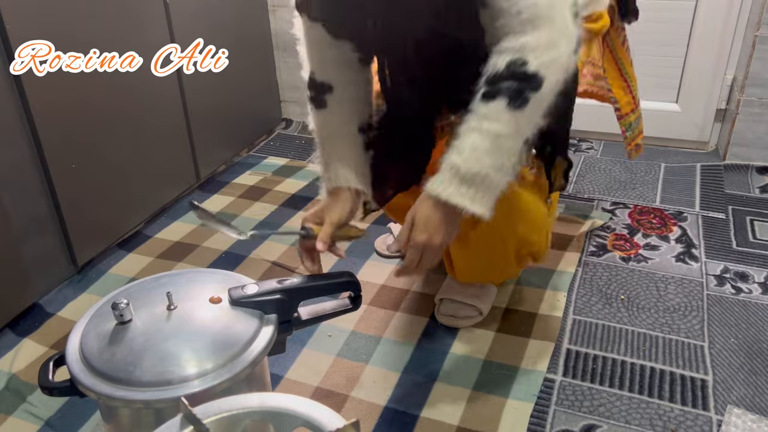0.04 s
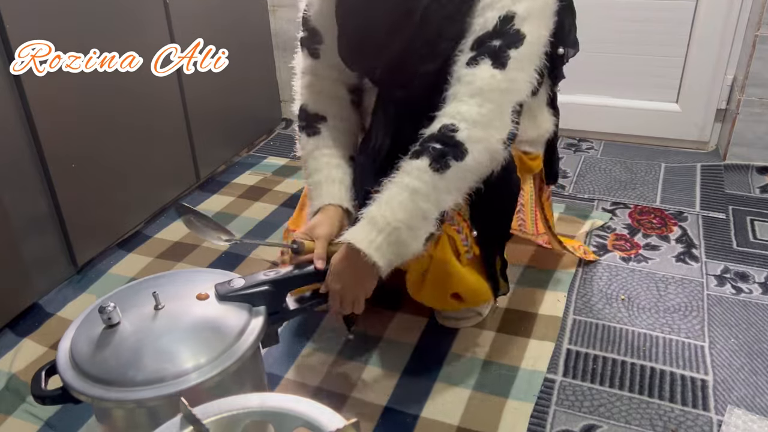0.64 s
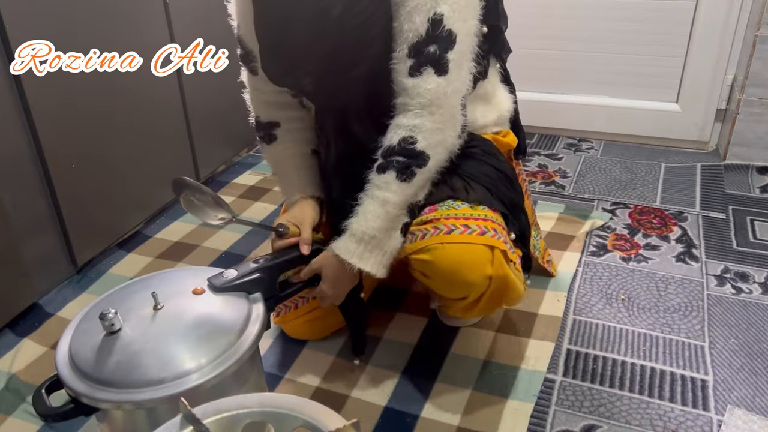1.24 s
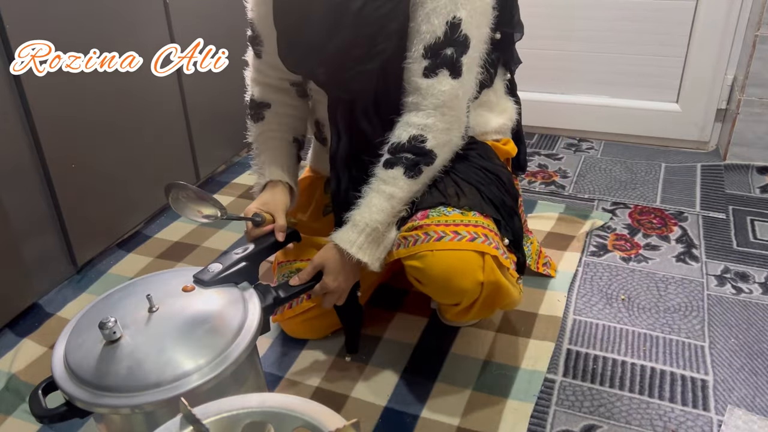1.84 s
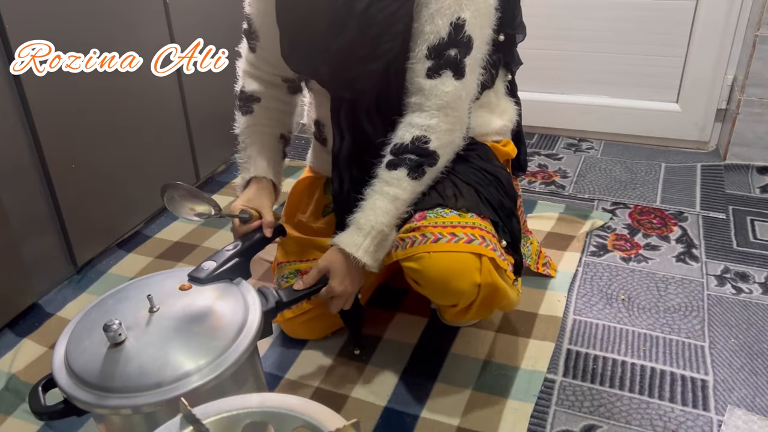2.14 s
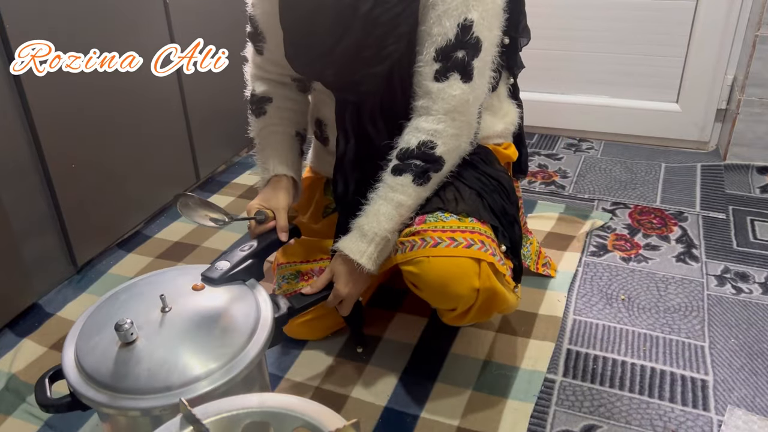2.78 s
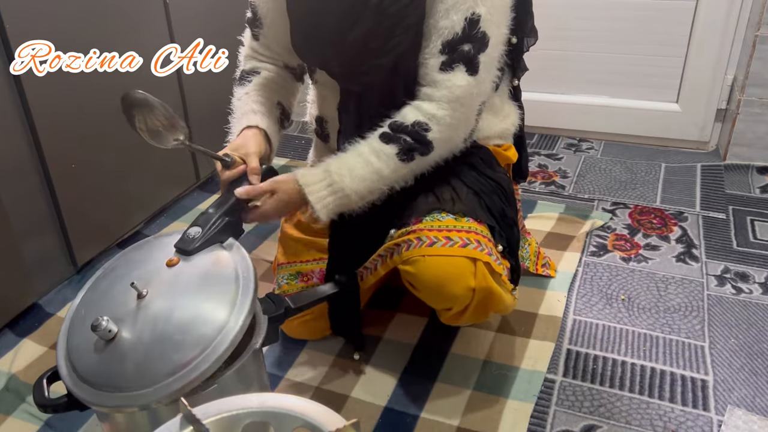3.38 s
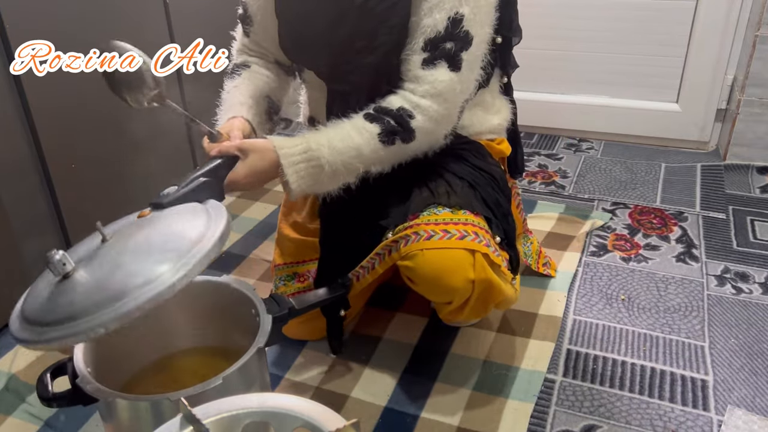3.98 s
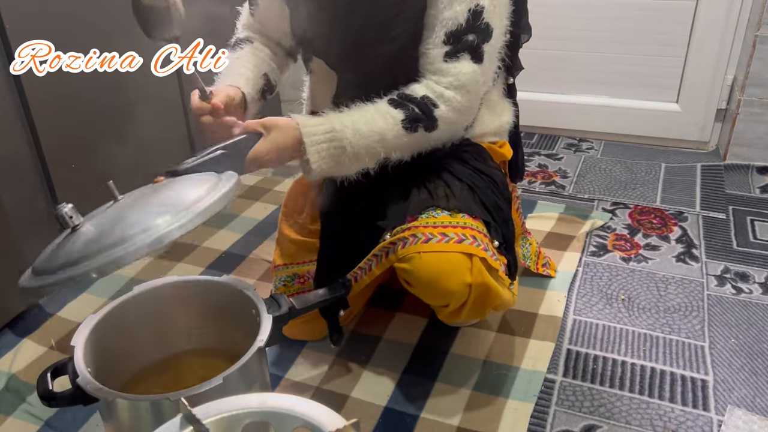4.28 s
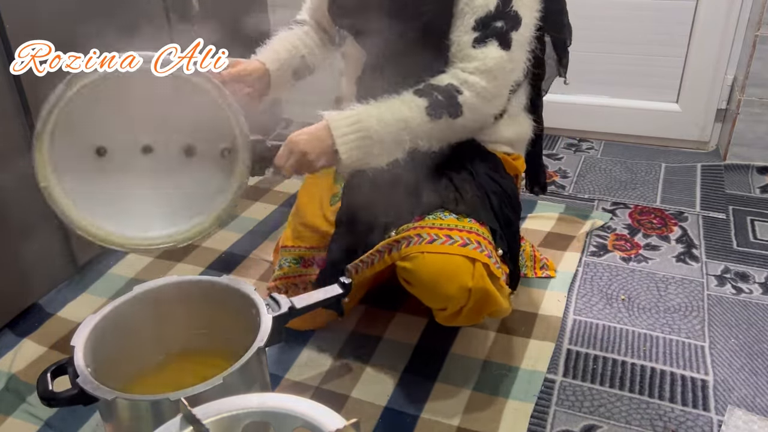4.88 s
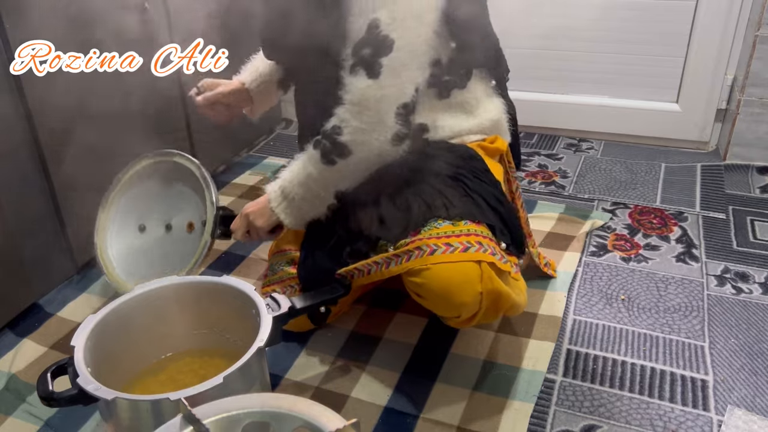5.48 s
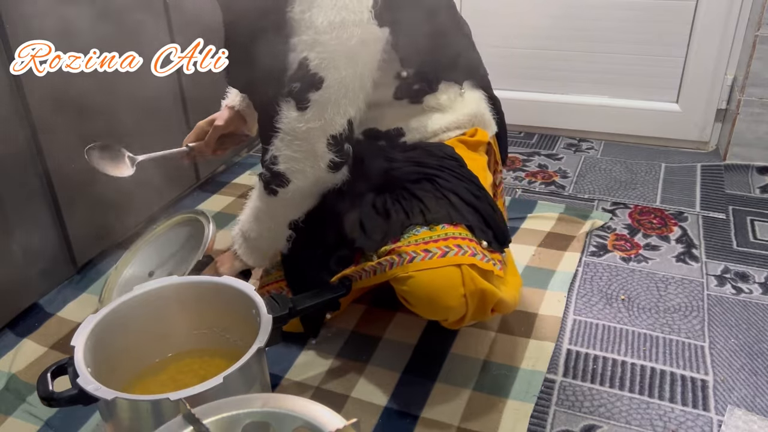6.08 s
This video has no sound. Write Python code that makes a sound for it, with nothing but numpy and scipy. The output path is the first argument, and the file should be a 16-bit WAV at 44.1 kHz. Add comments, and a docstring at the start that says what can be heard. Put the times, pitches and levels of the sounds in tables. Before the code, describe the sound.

A metal pressure cooker lid knocks and clunks as it is twisted open, then a ladle clinks and the lid is set down.

```python
"""A metal pressure cooker is opened on a kitchen floor, over a faint drone and hiss, in a small hard room.
0.3 s: a hand-held ladle knocks on the handles. 1.1-3.3 s: the lid twists and knocks in its lugs, damped
by the gasket. Through both, hands rub, sleeves swish and the full pot rocks and thuds against the floor.
4.1 s: the lid tilts up with thin stick-slip squeaks. 5.1 s: the ladle scrapes and strikes it, and rings.
6.0 s: the lid is set down, ringing. Each knock is a click, metal chatter, modes and a room tail."""
import sys
import numpy as np
from scipy import signal
from scipy.fft import rfft, irfft
from scipy.io import wavfile
from scipy.ndimage import uniform_filter1d

SR = 44100
rng = np.random.default_rng(int(sys.argv[2]) if len(sys.argv) > 2 else 0)


def waveform_to_disk(signal):
    """Save audio, clipped to [-1, 1], as 16-bit WAV at the path in sys.argv[1]."""
    frames = np.transpose(np.atleast_2d(signal))
    scaled = np.clip(frames, -1, 1) * 32767
    samples = np.round(scaled).astype(np.int16)
    wavfile.write(sys.argv[1], SR, samples)


N = 274468

# kitchen decay: f/Hz, t60/s
ROOM_T60 = [(120, 0.59), (450, 0.53), (1500, 0.63), (3800, 0.46), (7500, 0.33)]
# left-right correlation, clipped to +-1 in use: f/Hz, correlation
LIKENESS = [(70, 0.3), (220, 1.07), (500, 0.5), (1000, 0.1), (2000, 0.15), (4300, 0.28), (8000, 0.27)]
AIR_LIKENESS = [(60, 0.65), (290, 0.85), (640, -0.3), (1410, -0.65), (3100, -0.33), (15000, 0.054)]
# stereo balance: f/Hz, left minus right/dB
BALANCE = [(80, 0.5), (200, -1.5), (500, -0.72), (1500, -2.5), (4000, 2.2), (8000, -1.8)]
AIR_BALANCE = [(60, 1.5), (200, -1.5), (380, 0), (700, -2.5), (1290, 16.5), (2380, 9.5), (8120, 13.5),
               (15000, 3)]
# spectra of background, rubbing hands and sleeves: f/Hz, level/dB
AIR_COLOUR = [(22, -45.5), (40, -12.5), (150, -6), (175, -11.5), (202, 4), (237, -15), (325, -13),
              (700, -10), (1450, -12.5), (1900, -15.5), (2400, -22), (3100, -32), (6000, -31.5),
              (7000, -39.5), (9200, -40), (10500, -64)]
RUB_COLOUR = [(30, -10.5), (70, -4.5), (95, -1.5), (145, 3.5), (200, -3.5), (300, 0.5), (600, -7.5),
              (1000, -13.5), (2000, -30), (5000, -60)]
SWISH_COLOUR = [(400, -17.5), (1500, 8), (3000, 5.5), (6000, -1), (9000, -7.5), (10500, -29.5),
                (12000, -16.5), (14000, -31.5)]
# peaks in the hiss: f/Hz, width/Hz, lift/dB
HISS_BANDS = [(3540, 140, 14.1), (5900, 59, 11), (7730, 330, 18.9)]
# hand and sleeve movements: t/s, rise/s, time to release/s, rub/dB, swish/dB
MOVEMENTS = [ (0.093, 0.18, 0.29, -45.5, -63), (0.323, 0.04, 0.35, -51.5, -62.5),
             (0.706, 0.093, 0.32, -57, -63), (1.144, 0.052, 0.17, -53, -65), (1.46, 0.063, 0.25, -59, -64),
             (1.65, 0.03, 0.24, -54, -68), (1.978, 0.068, 0.11, -50.5, -59.5), (2.31, .03, 0.81, -54, -96),
             (2.476, 0.086, 0.056, -45, -54.5), (2.761, 0.025, 0.042, -41, -55.5),
             (3.144, 0.031, 0.3, -60.5, -97.5)]
# lid squeaks: t/s, length/s, first f/Hz, last f/Hz, level/dB
SQUEAKS = [(4.112, .125, 5600, 5880, -66), (4.12, .16, 2810, 3000, -73), (4.205, .1, 5400, 5000, -68),
           (4.19, .2, 4120, 3350, -76)]
# their hoarseness: t/s, rms waver/share of pitch
SQUEAK_WAVER = [(4.18, .007), (4.25, .021)]
# pot against floor: t/s, f/Hz, peak/dB
THUDS = [(.354, 155, -36), (.511, 111, -34), (1.310, 104, -33), (1.725, 98, -50.5), (1.828, 94, -45),
         (2.170, 88, -31), (2.199, 96, -31), (2.556, 108, -35), (2.592, 100, -35)]

# edges of the thump, body, clank, clink and tick bands: f/Hz
EDGES_HZ = [35, 250, 800, 2500, 5500, 10000]
# response to a hard blow, per band: level/dB
HANDLE_BANDS_DB = [-4, -4.5, 2, 2.5, -4.5]
COOKER_BANDS_DB = [-3, -2.5, -5, -4.5, -9]
LADLE_BANDS_DB = [-8, -1, 0, 3.5, 5]
LID_BANDS_DB = [-42, -16, 1.5, 3.5, -4]
# clear modes of handles, closed cooker, ladle on lid, free lid: f/Hz, level/dB
HANDLE_MODES = [(96, 8), (143, 15), (294, 6), (326, 6), (474, 4), (517, 6), (861, 4), (1055, 4), (1314, 4),
                (1486, 6), (1669, 4), (1739, 6), (1976, 7), (2118, 5), (2245, 4), (2756, 3), (3324, 8),
                (4107, 3), (4355, 5), (5760, 3)]
COOKER_MODES = [(95, 11), (144, 14), (196, 9), (238, 4), (295, 5), (351, 8), (378, 5), (474, 4), (548, 4),
                (565, 6), (685, 5), (727, 3), (834, 6), (968, 4), (1063, 3), (1217, 6), (1240, 6),
                (1362, 5), (1404, 5), (1880, 3), (1969, 7), (2030, 4), (2185, 4), (2258, 6), (2961, 1),
                (3120, 1), (3295, 6), (4362, 1), (4920, 2), (6193, 2), (8070, 2)]
LADLE_MODES = [(202, 10), (283, 9), (725, 7), (1808, 7), (1855, 11), (2092, 7), (2462, 11), (2488, 9),
               (3015, 9), (3092, 6), (3537, 9), (4457, 4), (4936, 10), (5573, 25), (5630, 18), (6406, 4),
               (7682, 10), (7973, 17), (8349, 11), (8918, 8), (9582, 6), (11950, 0), (15100, -3)]
LID_MODES = [(150, 6), (450, 6), (506, 10), (689, 7), (718, 9), (791, 12), (1815, 11), (1850, 14),
             (2148, 8), (2579, 8), (3076, 8), (3994, 8), (4448, 4), (6412, 4), (7660, 4)]
# mode decay before hand damping: f/Hz, t60/s
RING_T60 = [(140, .66), (500, 0.25), (1800, .6), (5600, 0.3), (8500, 0.4), (11000, 0.23)]
# spectra of the dense weaker modes: f/Hz, level/dB
HANDLE_COLOUR = [(29, -51), (50, -30), (136, -3), (193, -7.5), (282, -9), (439, -2.5), (612, -8),
                 (1190, -15.5), (1980, -8), (2590, -17.5), (3230, -12), (3800, -14.5), (4450, -13),
                 (5000, -22.5), (9150, -26), (10000, -48), (13000, -100), (22000, -120)]
COOKER_COLOUR = [(24, -46), (40, -16.5), (139, -7.5), (313, -6.5), (532, 1.5), (770, -7.5), (1370, -6),
                 (1650, -13.5), (1890, -6.5), (2440, -21), (3010, -17), (8510, -29), (10000, -38.5),
                 (13000, -80.5), (22000, -120)]
LADLE_COLOUR = [(59, -31.5), (100, -19), (283, -16.5), (1510, -15), (1800, 5.5), (2450, -9), (2700, -12),
                (2970, 0), (5190, -10), (5610, -20), (6060, -6.5), (10000, -1.5), (13000, -67.5),
                (22000, -120)]
LID_COLOUR = [(59, -64), (100, -14), (495, -7), (589, -9), (742, -16), (849, -9.5), (1480, -12),
              (1830, 3.5), (2360, -10.5), (3150, -8), (7940, -27.5), (10000, -35), (13000, -105),
              (22000, -120)]
# ladle on handles, lid turned in its lugs, ladle on lid, lid set down:
# t/s, strength/dB, bass heft/dB, contact/ms, chatter/s, room/dB, struck spot's f/Hz, its lift/dB
HANDLE_KNOCKS = [ (.309, -37.5, -18, 1.17, 0.0017, -15, 1370, 18),
                 (.3145, -31, -26, 2.3, 0.0075, -21, 515, 22), (.350, -31, -9, 0.96, 0.0077, -8, 610, 5.5),
                 (.360, -31, -4.5, 1.3, 0.0026, -23, 285, 10.5),
                 (.390, -44.5, -3, 0.44, 0.012, -15, 1860, 29),
                 (.498, -29, -7, 0.47, 0.022, -11.5, 667, 16),
                 (.508, -33.5, -1, 0.42, 0.011, -10.5, 880, 5),
                 (.525, -33.5, -4.5, 0.51, 0.0099, -8.5, 1930, -11)]
TWIST_KNOCKS = [ (1.146, -46, -12, 0.93, 0.025, -27, 3200, 22), (1.147, -38.5, -17, 3, 0.01, -14, 710, 28),
                (1.237, -58, 8, 0.03, 0.0094, -7, 288, 30), (1.299, -49, 0.5, 1.5, 0.012, -4, 314, 7),
                (1.565, -60.5, -2.5, 0.27, 0.008, -12, 2520, 3),
                (1.805, -46.5, -8.5, 2.1, 0.008, 10, 570, 3),
                (2.153, -30, -22.5, 3.6, 0.0027, -11, 634, 28), (2.168, -30, -5.5, 1.06, 0.04, -32, 280, 9),
                (2.190, -23, -17, 0.16, 0.0068, -5.5, 1255, 7.5),
                (2.1955, -24.5, -16.5, 0.05, 0.0018, -22, 547, -9),
                (2.1995, -24, -11.5, 0.18, 0.0072, -13, 2300, 13.5),
                (2.2025, -24, -15, 1, 0.0051, -19, 555, 5.5),
                (2.536, -33.5, -5, 0.45, 0.015, -9.5, 2300, 13.5),
                (2.5785, -28, -11.5, 0.46, 0.0069, -13.5, 1360, 11),
                (2.588, -34, -12, 0.45, 0.0021, -14, 473, 11),
                (2.799, -35, 0.5, 0.16, 0.0022, -4.5, 2810, 3), (2.808, -25.5, -7, 1, 0.011, -11, 530, 2),
                (2.842, -32.5, -17, 0.96, 0.025, -19, 690, 0), (2.866, -44, 12, 0.39, 0.041, -7.5, 220, 22),
                (3.034, -42, 0.5, 0.55, 0.011, -5, 480, 25.5), (3.286, -53, 4, 2, 0.021, -7.5, 261, 32.5)]
LADLE_KNOCKS = [(5.051, -53, -6, 0.25, 0.049, -17, 2830, 15), (5.09, -57, 1, 0.18, 0.092, -5, 3140, 2.8),
                (5.155, -39.5, -8, 0.052, 0.0072, -9, 2470, 4.9)]
LID_KNOCKS = [(5.965, -55.5, 11, 0.27, 0.0051, -8.5, 397, 6.2),
              (5.972, -41, -13.5, 0.18, 0.02, -7, 4400, 16),
              (5.978, -41.5, 7, 0.086, 0.029, -2.5, 1810, 22),
              (6.037, -43.5, 22.5, 0.14, 0.011, -8.5, 743, 14.6),
              (6.044, -49, 24.5, 0.27, 0.0097, -14, 3840, 4.1)]

EVENT_SAMPLES, ATTACK_SAMPLES = 2 ** 15, 1323  # a knock's first 30 ms set its level


def amp(db):
    """Decibels to gain."""
    return 10 ** (np.asarray(db) / 20)


def lookup(points, hz):
    """Table value on a log-frequency axis."""
    f, value = np.transpose(points)
    return np.interp(np.log(hz + 1), np.log(f + 1), value)


def unit_rms(x, count=None):
    """Scales x so its first count samples (or all) have rms 1."""
    return x / np.sqrt(np.mean(x[..., :count] ** 2) + 1e-20)


def hump(hz, centre_hz, width_hz, db):
    """Gain of a resonance db above its surroundings."""
    return np.sqrt(1 + (amp(db) ** 2 - 1) / (1 + (2 * (hz - centre_hz) / width_hz) ** 2))


def add(mix, start_s, sound):
    """Mixes a sound in at start_s."""
    part = mix[:, max(round(start_s * SR), 0):][:, :sound.shape[1]]
    part += sound[:, :part.shape[1]]


def sides(balance, hz):
    """Left and right gains per frequency."""
    return amp(np.array([[.5], [-.5]]) * lookup(balance, hz))


def noise(gain, hz, likeness=LIKENESS, balance=BALANCE):
    """Coloured stereo noise, partly correlated, rms 1."""
    left, other = np.exp(2j * np.pi * rng.random((2, len(hz))))
    same = np.clip(lookup(likeness, hz), -1, 1)
    right = same * left + np.sqrt(1 - same ** 2) * other
    return unit_rms(irfft(np.array([left, right]) * gain * sides(balance, hz)))


def wander(rate_hz):
    """Slow random curve, rms 1."""
    hz = np.fft.rfftfreq(N, 1 / SR)
    return unit_rms(irfft(rfft(rng.standard_normal(N)) / (1 + (hz / rate_hz) ** 4), N))


def air(level_db=-60.5, drop_db=3, drop_at_s=5.36, drop_takes_s=0.19):
    """Low drone and faint hiss with narrow peaks; the level drops slightly near the end."""
    hz = np.fft.rfftfreq(N, 1 / SR)
    colour = amp(lookup(AIR_COLOUR, hz)) * np.prod([hump(hz, *band) for band in HISS_BANDS], axis=0)
    dropped = np.clip((np.arange(N) / SR - drop_at_s) / drop_takes_s, 0, 1)
    return noise(colour, hz, AIR_LIKENESS, AIR_BALANCE) * amp(level_db - drop_db * dropped)


def movement(start_s, rise_s, length_s, release_db_per_s=77):
    """Envelope of one movement: builds up, dies away after length_s."""
    t = np.arange(N) / SR - start_s
    return np.clip(t / rise_s, 0, 1) * amp(-release_db_per_s * np.maximum(t - length_s, 0))


def handling(rub_lumps_db=2, swish_lumps_db=1.5, slips_per_s=45, slip_db=-9, slip_decay_s=0.0045):
    """Hands rub the cooker in uneven pushes with small sudden slips; sleeves swish along."""
    hz = np.fft.rfftfreq(N, 1 / SR)
    body = np.max([hump(hz, f, 35, 0.3 * db) for f, db in COOKER_MODES], axis=0)
    slips = (rng.random(N) < slips_per_s / SR) * rng.uniform(.5, 2, N)
    slips = unit_rms(signal.lfilter([1], [1, -np.exp(-1 / (slip_decay_s * SR))], slips))
    friction = noise(1, hz) * amp(rub_lumps_db * wander(rate_hz=18)) * (1 + amp(slip_db) * slips)
    rub = unit_rms(irfft(rfft(friction) * amp(lookup(RUB_COLOUR, hz)) * body, N))
    cloth = noise(amp(lookup(SWISH_COLOUR, hz)), hz)
    swish = unit_rms(cloth * amp(swish_lumps_db * wander(rate_hz=60)))
    power = sum((amp(levels_db)[:, None] * movement(start_s, rise_s, length_s)) ** 2
                for start_s, rise_s, length_s, *levels_db in MOVEMENTS)
    rub_gain, swish_gain = np.sqrt(power)
    return rub * rub_gain + swish * swish_gain


def squeaks(stutter_db=3):
    """The tilting lid sticks and slips: faint whistles that glide ever faster and turn hoarse."""
    out = np.zeros((2, N))
    for start_s, length_s, first_hz, last_hz, db in SQUEAKS:
        t = np.arange(0, length_s, 1 / SR)
        jitter = unit_rms(uniform_filter1d(rng.standard_normal((2, len(t))), size=100))
        waver = np.interp(start_s + t, *np.transpose(SQUEAK_WAVER)) * jitter
        pitch_hz = (first_hz + (last_hz - first_hz) * (t / length_s) ** 2) * (1 + waver)
        stutter = amp(stutter_db * unit_rms(uniform_filter1d(rng.standard_normal(len(t)), size=200)))
        whistle = unit_rms(stutter * np.sin(2 * np.pi * np.cumsum(pitch_hz, axis=1) / SR))
        add(out, start_s, amp(db) * np.sin(np.pi * t / length_s) * whistle)
    return out


def thuds(rise_s=0.014, boom_share=0.083, boom_t60_s=0.19):
    """The full pot rocks on its mat: each thud swells, dies fast and leaves a faint boom in the floor."""
    t, out = np.arange(EVENT_SAMPLES) / SR, np.zeros((2, N))
    push = (t / rise_s) ** 2 * np.exp(2 * (1 - t / rise_s))
    boom = boom_share * (1 - np.exp(-t / rise_s)) * np.exp(-np.log(1000) * t / boom_t60_s)
    for start_s, hz, db in THUDS:
        tone = np.sin(2 * np.pi * (hz * t + rng.random()))
        add(out, start_s, amp(db) * np.hypot(push, boom) * tone[None])
    return out


def crack(t, spread_s=0.01, bounce_s=0.0038, bounce_gain=0.63):
    """Contact click, its bounce off the cabinet and a few scattered slaps."""
    clicks = np.zeros((2, len(t)))
    clicks[:, int(.001 * SR)] = 1
    clicks[:, int(bounce_s * SR)] = bounce_gain
    for side in clicks:
        side[(rng.uniform(.002, spread_s, size=5) * SR).astype(int)] += rng.normal(0, 0.71, size=5)
    return clicks


def ringing(modes, t, spot_hz, spot_db, twin_share=.5, hand_damping_db_per_s=14, rise_s=0.0011):
    """Fluttering metal ring: each mode beats with a slightly detuned twin. Modes x channels x time."""
    hz, db = np.transpose(modes)
    left = rng.uniform(0, 2 * np.pi, len(hz))
    right = left + rng.choice([-1, 1], len(hz)) * np.arccos(np.clip(lookup(LIKENESS, hz), -1, 1))
    phase = np.array([left, right])[..., None]
    gain = amp(db) * hump(hz, spot_hz, .16 * spot_hz, spot_db) * sides(BALANCE, hz)
    loss_per_s = np.log(1000) / lookup(RING_T60, hz) + np.log(amp(hand_damping_db_per_s))
    fade = np.exp(-loss_per_s[:, None] * t) * (1 - np.exp(-t / rise_s))
    twin_hz = hz * (1 + rng.uniform(-.0075, .005, len(hz)))
    tone = np.sin(2 * np.pi * hz[:, None] * t + phase)
    twin = np.cos(2 * np.pi * twin_hz[:, None] * t + phase)
    return ((tone + twin_share * twin) * fade * gain[..., None]).swapaxes(0, 1)


def blows(rows, bands_db, steepness, heft_below_hz=250):
    """Band levels per knock: long, soft contact loses treble; weight behind it adds bass."""
    centres_hz = np.sqrt(np.multiply(EDGES_HZ[:-1], EDGES_HZ[1:]))
    for start_s, strength_db, heft_db, contact_ms, *rest in rows:
        cycles = centres_hz * contact_ms / 1000
        dulling_db = 10 * np.log10(1 + cycles ** steepness)
        bass_db = heft_db * (centres_hz < heft_below_hz)
        yield start_s, strength_db + np.array(bands_db) + bass_db - dulling_db, *rest


def knocks(hits, modes, colour, ring_db, crack_db, min_width_hz, sparkle_db, hard_blow_db=-34):
    """Struck metal, band by band: a crack, brief chatter, ringing modes and the room's tail."""
    t, hz = np.arange(EVENT_SAMPLES) / SR, np.fft.rfftfreq(EVENT_SAMPLES, 1 / SR)
    peaks = np.max([hump(hz, f, min_width_hz + 0.0084 * f, db) for f, db in modes], axis=0)
    body = amp(lookup(colour, hz)) * peaks
    mode_hz, out = np.array(modes)[:, 0], np.zeros((2, N))
    highpass = signal.butter(4, EDGES_HZ[-1], "high", fs=SR, output="sos")
    for start_s, levels_db, chatter_s, room_db, spot_hz, spot_db in hits:
        dense = noise(body * hump(hz, spot_hz, 0.091 * spot_hz, spot_db), hz)
        clicks, rings = crack(t), ringing(modes, t, spot_hz, spot_db)
        chatter = np.exp(-(t / chatter_s) ** 2)
        sound = np.zeros((2, len(t)))
        for low_hz, high_hz, db in zip(EDGES_HZ, EDGES_HZ[1:], levels_db):
            band = signal.butter(4, (low_hz, high_hz), "band", fs=SR, output="sos")
            centre_hz = np.sqrt(low_hz * high_hz)
            tail = amp(room_db) * np.exp(-np.log(1000) * t / lookup(ROOM_T60, centre_hz))
            swell = 1 - np.exp(-t / (.17 * chatter_s + .6 / centre_hz))  # scrapes and bass build slowly
            ring = rings[(mode_hz >= low_hz) & (mode_hz < high_hz)].sum(0)
            part = unit_rms(signal.sosfilt(band, dense) * np.hypot(chatter, tail) * swell, ATTACK_SAMPLES)
            part += amp(crack_db) * unit_rms(signal.sosfilt(band, clicks + 1e-12), ATTACK_SAMPLES)
            part += amp(ring_db + room_db) * unit_rms(ring, ATTACK_SAMPLES)
            sound += amp(db) * unit_rms(part, ATTACK_SAMPLES)
        # above the bands: sparkle during contact, then only the highest modes
        grit = 0.2 * rng.standard_normal(clicks.shape) * np.exp(-t / chatter_s)
        sparkle = unit_rms(signal.sosfilt(highpass, clicks + grit + 1e-12), ATTACK_SAMPLES)
        treble = amp(sparkle_db) * sparkle + amp(-19) * rings[mode_hz >= EDGES_HZ[-1]].sum(0)
        softness_db = 0.9 * min(levels_db[-1] - hard_blow_db, 0)  # gentle contact is duller
        add(out, start_s, sound + amp(levels_db[-1] + softness_db) * treble)
    return out


def scene():
    """Four sets of knocks over thuds, handling, background and squeaks."""
    handles = knocks(blows(HANDLE_KNOCKS, HANDLE_BANDS_DB, steepness=3.25), HANDLE_MODES, HANDLE_COLOUR,
                     ring_db=-0.5, crack_db=-28, min_width_hz=2.8, sparkle_db=-24)
    twist = knocks(blows(TWIST_KNOCKS, COOKER_BANDS_DB, steepness=2.7), COOKER_MODES, COOKER_COLOUR,
                   ring_db=0.5, crack_db=-12, min_width_hz=9, sparkle_db=-22)
    ladle = knocks(blows(LADLE_KNOCKS, LADLE_BANDS_DB, steepness=9.3), LADLE_MODES, LADLE_COLOUR,
                   ring_db=3.5, crack_db=-15, min_width_hz=6.5, sparkle_db=-10)
    lid = knocks(blows(LID_KNOCKS, LID_BANDS_DB, steepness=5.9, heft_below_hz=800), LID_MODES, LID_COLOUR,
                 ring_db=-4, crack_db=-45, min_width_hz=5, sparkle_db=-22)
    return handles + twist + ladle + lid + thuds() + handling() + air() + squeaks()


def record(dry, low_cut_hz=15, mono_below_hz=68, cutoff_hz=16000):
    """Two closely spaced microphones: low cut, bass alike in both, band limit."""
    hz = np.fft.rfftfreq(N, 1 / SR)
    spectrum = rfft(dry) * (1 - 1 / (1 + (hz / low_cut_hz) ** 4))
    side_bass = (spectrum - spectrum.mean(0)) / (1 + (hz / mono_below_hz) ** 2)
    heard = irfft(spectrum - side_bass, N)
    lowpass = signal.firwin(255, cutoff_hz, window=("kaiser", 9), fs=SR)
    return signal.oaconvolve(heard, lowpass[None], "same", axes=1)


dry = scene()
out = record(dry)
waveform_to_disk(out)
```